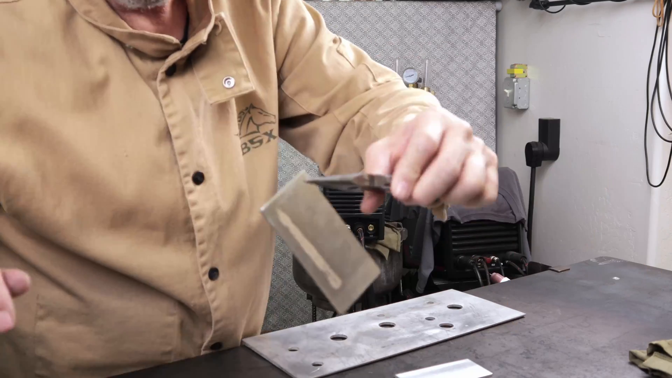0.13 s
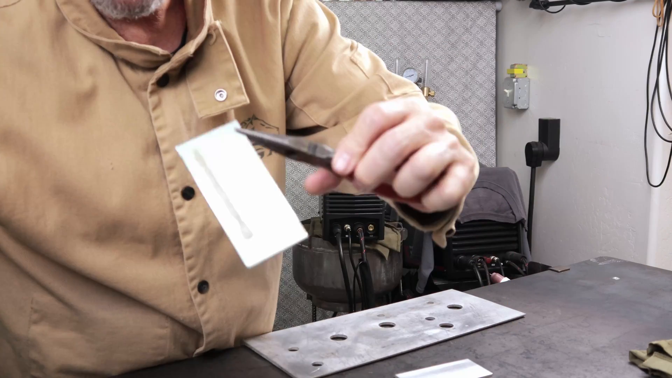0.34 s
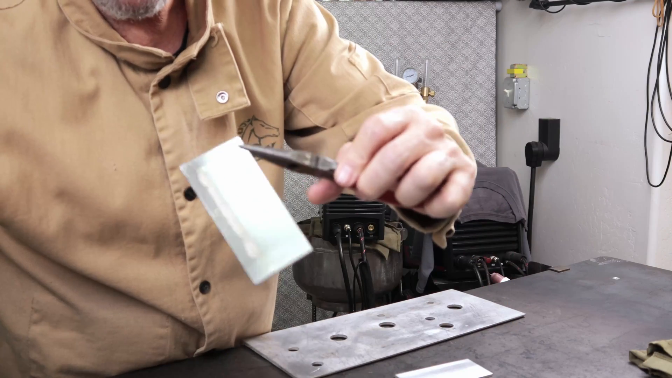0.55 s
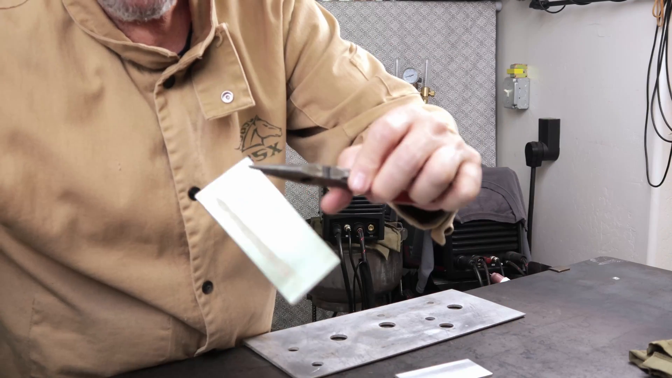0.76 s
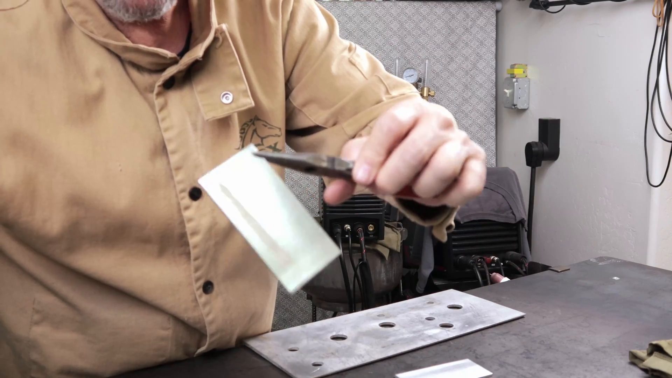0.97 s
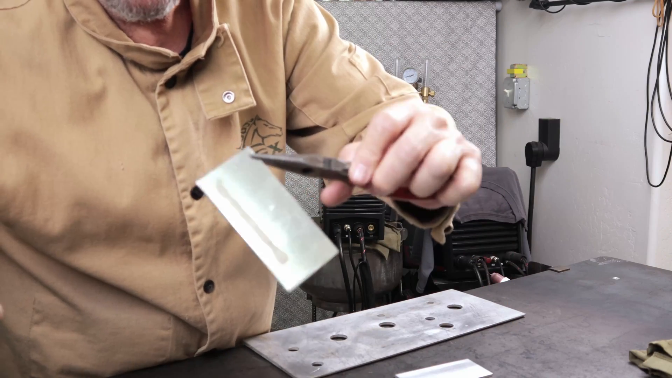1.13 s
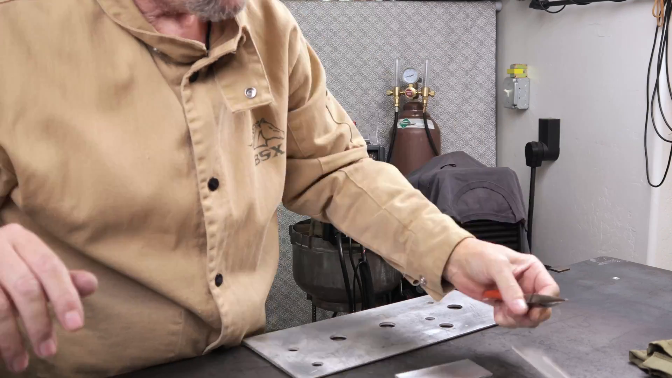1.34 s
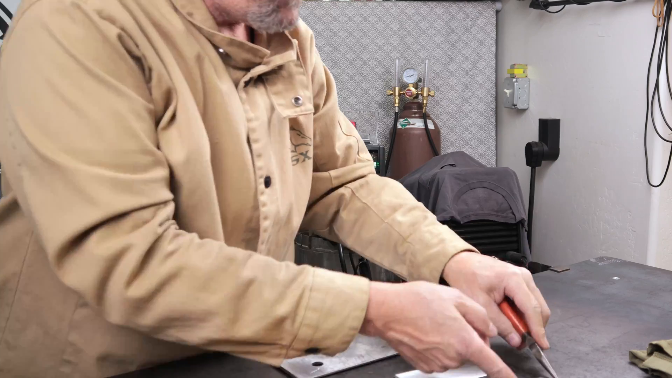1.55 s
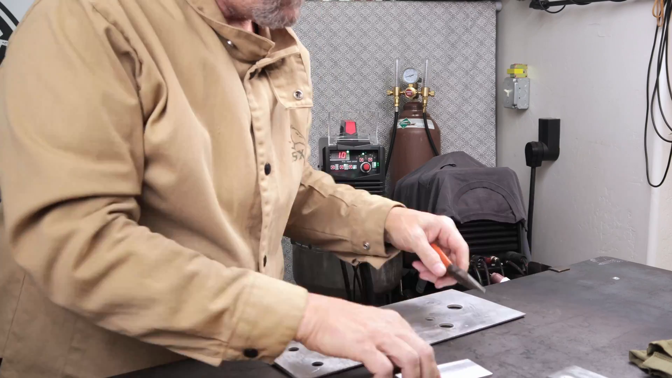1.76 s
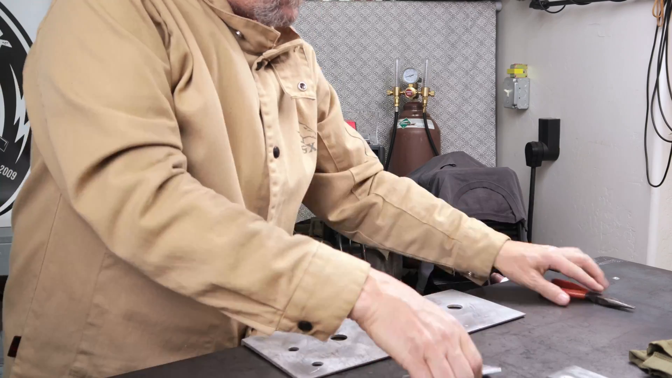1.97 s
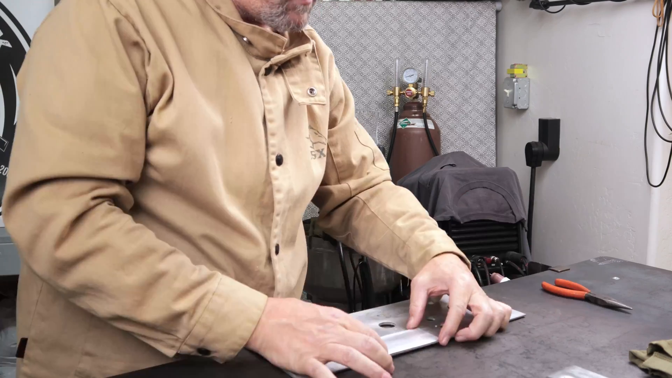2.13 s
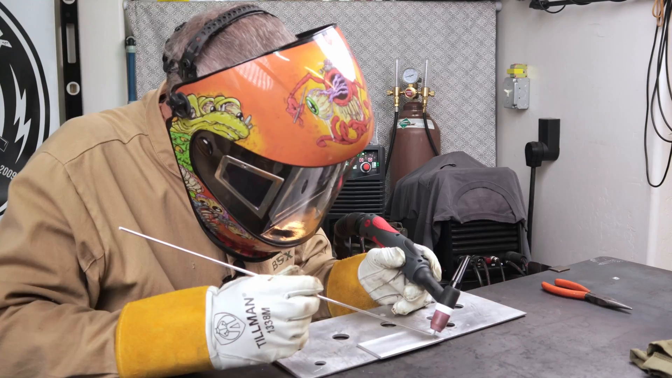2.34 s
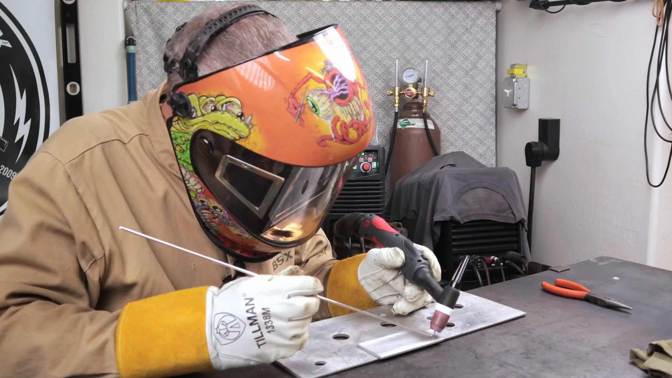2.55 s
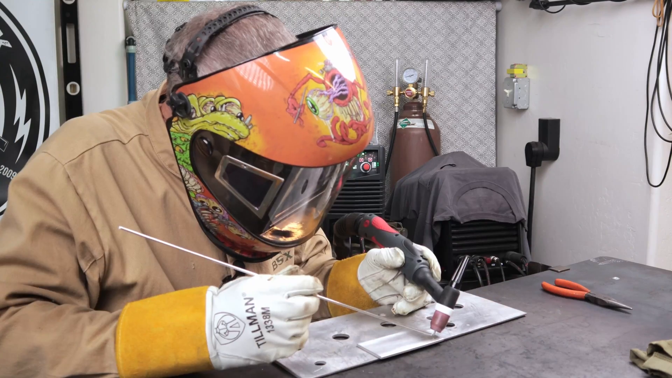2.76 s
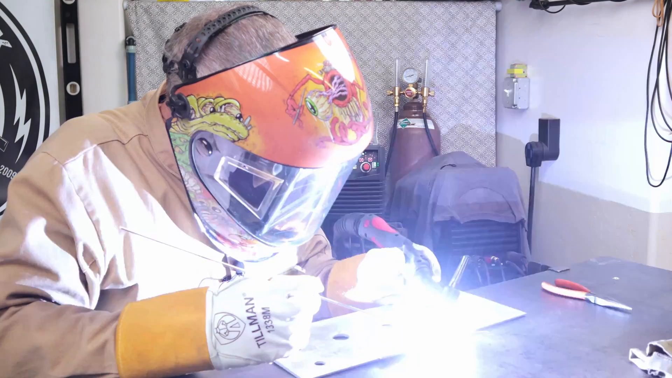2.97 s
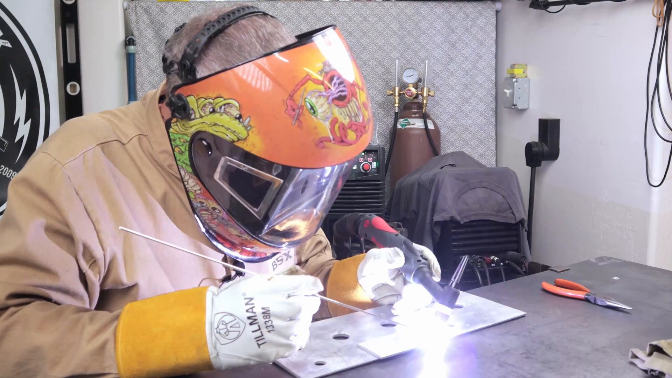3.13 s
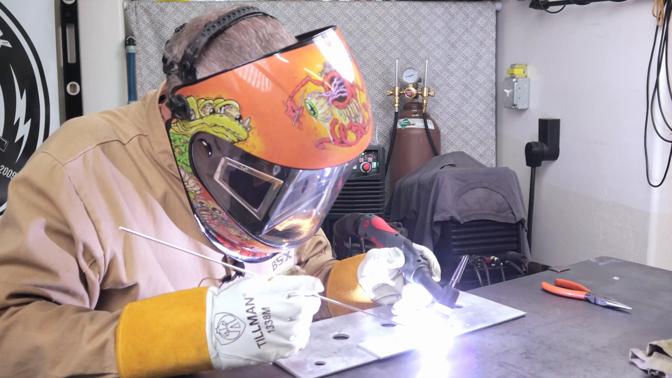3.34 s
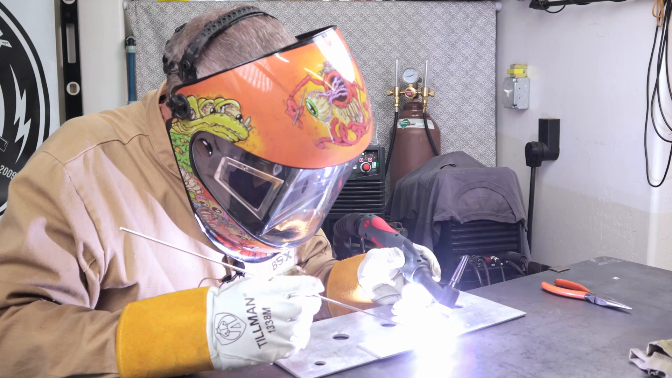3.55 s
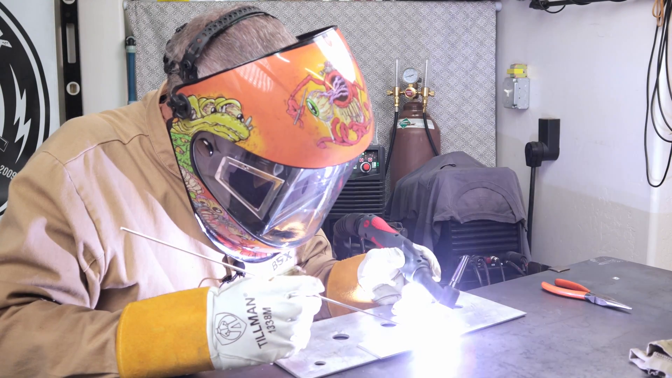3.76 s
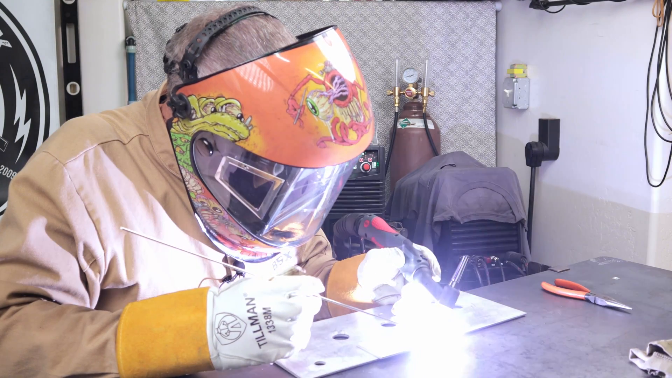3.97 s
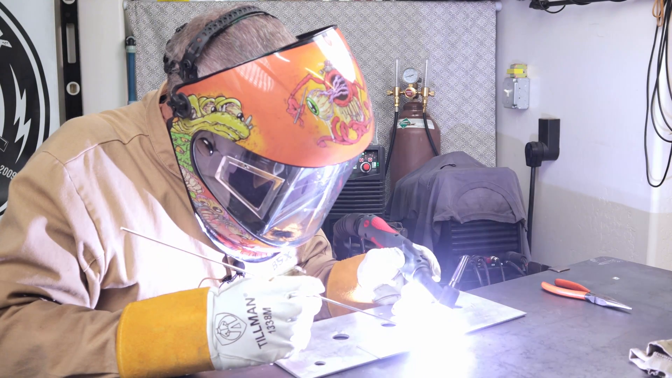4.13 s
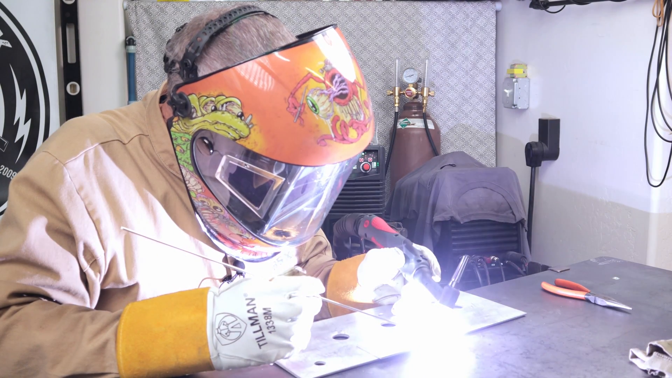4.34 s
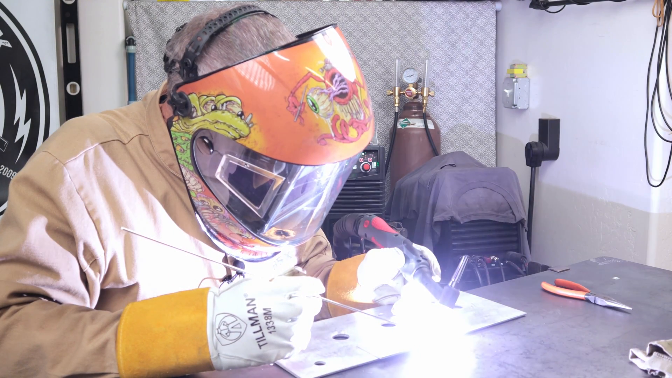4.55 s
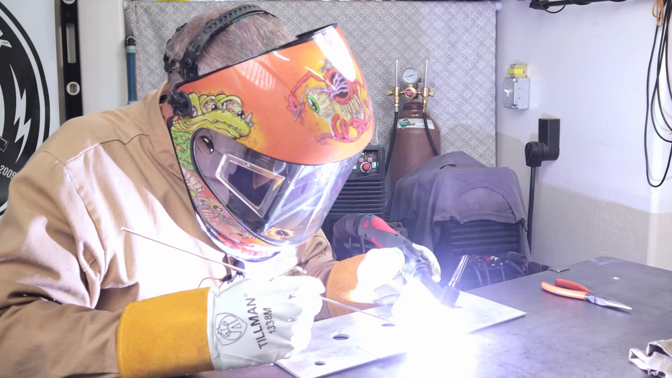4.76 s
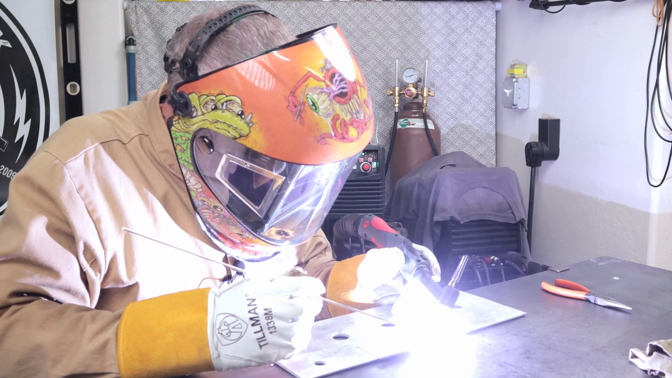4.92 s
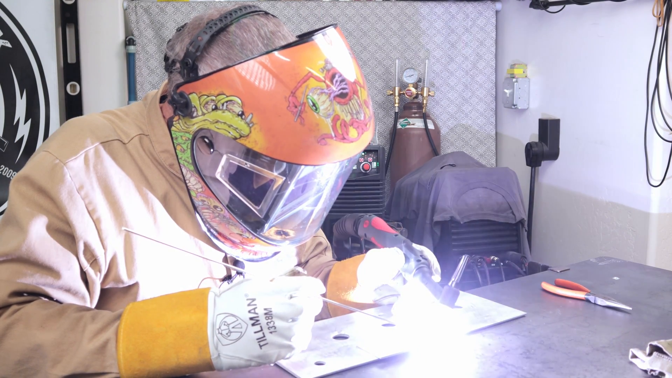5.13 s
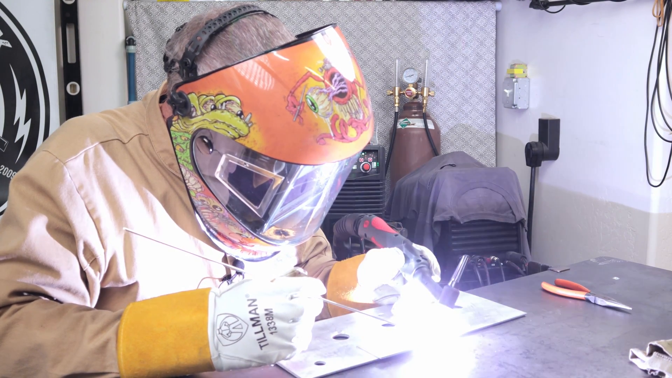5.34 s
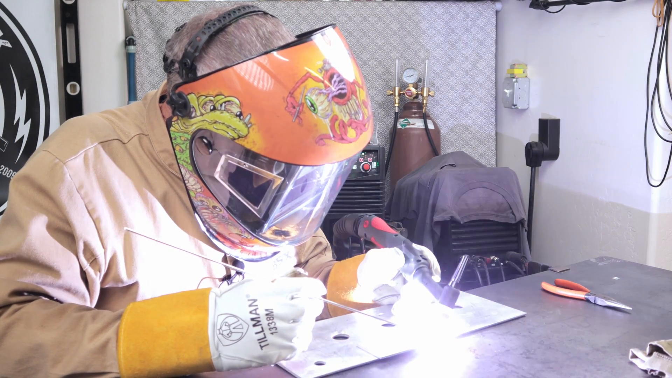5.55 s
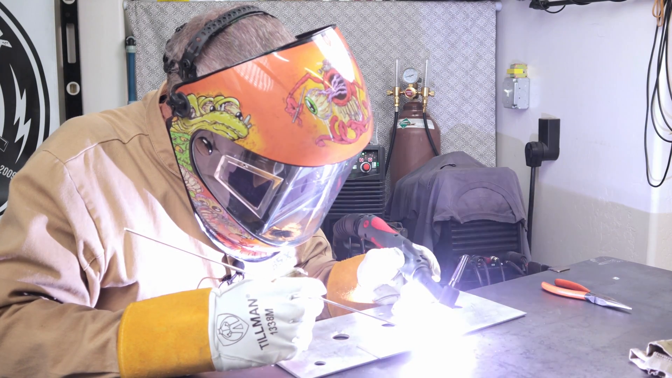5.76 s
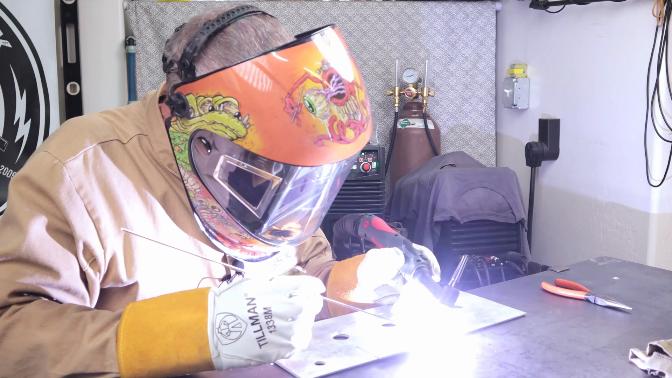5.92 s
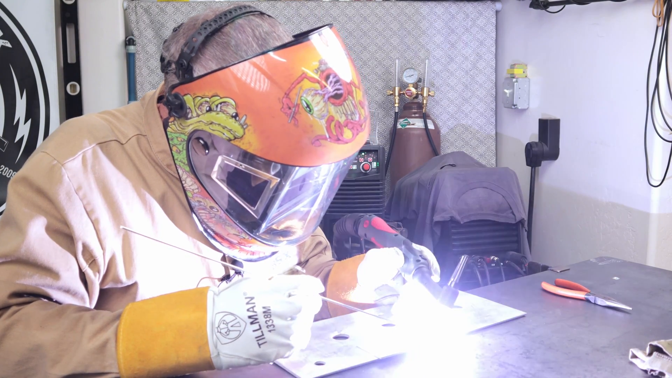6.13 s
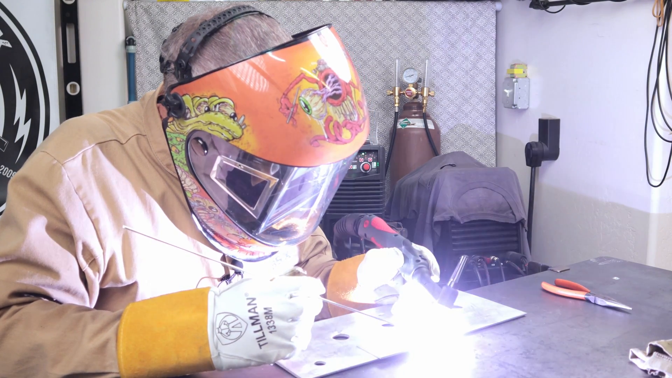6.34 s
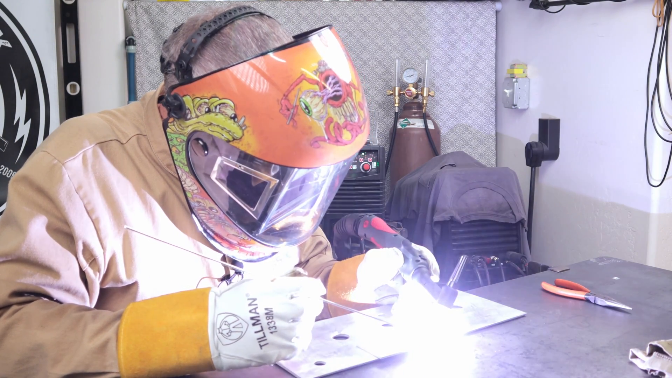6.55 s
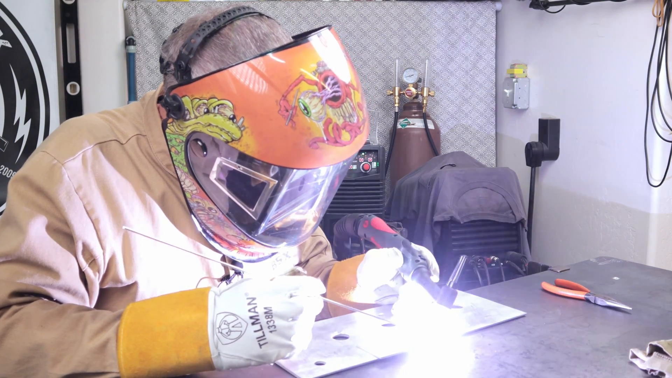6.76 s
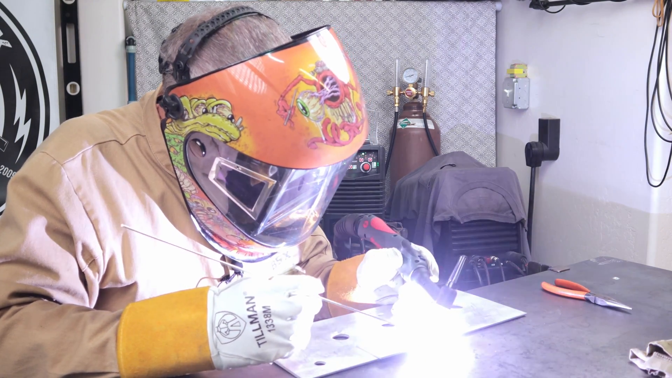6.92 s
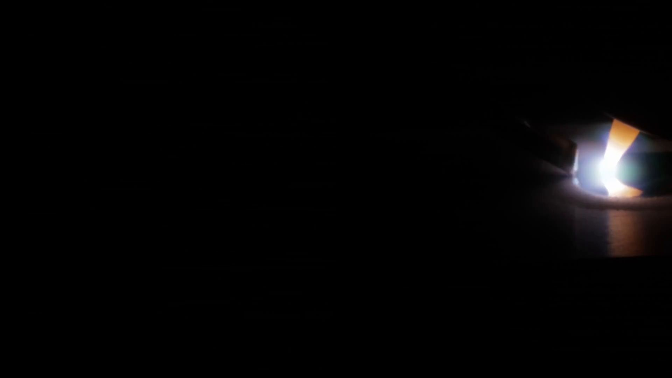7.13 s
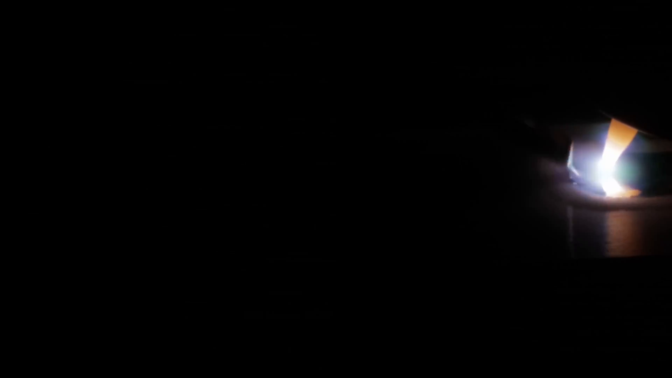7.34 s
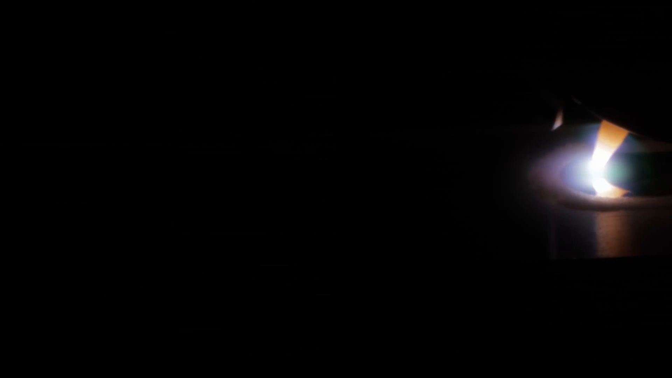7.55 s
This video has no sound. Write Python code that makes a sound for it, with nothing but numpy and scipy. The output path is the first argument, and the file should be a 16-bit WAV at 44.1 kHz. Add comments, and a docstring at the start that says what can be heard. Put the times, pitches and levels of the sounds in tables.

```python
"""Beside a whining cooling fan, a faint tool tick, then a metal test piece clatters onto a steel bench and
more tools tap, with a soft rustle between; the shop fades out and the scene cuts to an AC TIG weld.
The gas valve spits, shielding gas hisses and the nozzle whistles; the high-frequency starter pops and
rattles in the microphone lead, and the arc lights with a flare of hiss. It settles into a hard, even buzz:
two filtered clicks, or snaps, in every current cycle, one at each reversal of polarity."""
import sys
import numpy as np
from scipy import signal
from scipy.fft import rfft, irfft
from scipy.io import wavfile

SR = 44100
rng = np.random.default_rng(int(sys.argv[2]) if len(sys.argv) > 2 else 0)


def persist_wave(psi):
    """Save psi, clipped to +-1, as 16-bit WAV."""
    counts = np.round(np.clip(psi, -1, 1) * 32767).astype(np.int16)
    wavfile.write(sys.argv[1], SR, np.atleast_2d(counts).T)


N = 339129
TIME = np.arange(N) / SR  # s
CUT_S, STRIKE_S = 2.293, 3.0661  # the cut to the weld; the arc's first reversal
ARC_HZ, BALANCE_SHARE = 119.573, .348  # current cycles a second; share of a cycle between its two reversals
FLOW_S, FLOW_RISE_S = 2.889, .01  # start and build-up of the gas flow


def arc():
    """The plasma collapses and relights at each reversal: a thin snap, then a fuller one."""
    # colour of one snap: (frequency [Hz], level [dB])
    snap_colour = [(120, -51), (350, -10.5), (780, -10.5), (1050, -8.5), (1700, -24), (2200, -8),
                   (3900, -0.5), (4500, -2), (6000, -6.5), (7600, -3), (9400, -2.5), (11500, -12.5),
                   (14000, -16), (15800, -25)]
    # narrow peaks and hollows in the colour of the buzz: (frequency [Hz], nominal width [Hz], level [dB])
    buzz_peaks = [(955, 67, 0), (1290, 350, -5.5), (1450, 155, 8.5), (1962, 128, 9.5), (2413, 116, -5),
                  (2530, 300, 1.5), (2950, 300, 2.2), (3514, 100, 2), (4000, 420, -1.5), (4210, 310, 3),
                  (7200, 130, -5), (7230, 140, 3), (10830, 250, -6), (11360, 310, 4), (12400, 300, -11),
                  (12650, 310, 4), (14250, 450, 5)]
    # hollows that vanish as the metal warms: (frequency [Hz], nominal width [Hz], level [dB])
    cold_hollows = [(4170, 1050, -7.5), (7550, 1300, -4.5), (10140, 750, -7), (12400, 550, -10),
                    (13300, 1100, -9)]
    # hollows that open towards the end of the seam: (frequency [Hz], nominal width [Hz], level [dB])
    end_hollows = [(5380, 340, -5.5), (9400, 1100, -4.5), (11400, 650, -9)]
    # level of the buzz's body, under 900 Hz: (time [s], level [dB])
    body_level = [(3.07, -40), (3.2, -33), (3.8, -35), (4.9, -47), (6.1, -39), (6.7, -41.5), (7.0, -34),
                  (7.2, -40.5)]
    # magnetic hum of the welding current, once settled: (multiple of the cycle rate, level [dB rms])
    hum_tones = [(1, -60.5), (2, -59)]

    thin = band(reversals(0, clock_pull=0.6, jitter_s=2e-6, uneven_db=0.78), 400, "high")
    full = band(reversals(BALANCE_SHARE, clock_pull=0.23, jitter_s=2e-6, uneven_db=0.58), 7200, "low")
    snaps = colour(thin + amp(3.0) * full, snap_colour)
    snaps = disperse(shape(snaps, buzz_peaks), hz=9100, width_hz=2040)
    coldness = 1 - warming(0, 1) ** 2
    snaps += coldness * (shape(snaps, cold_hollows) - snaps)

    # the snaps lose low end as the torch travels along the seam
    travel = np.clip((TIME - STRIKE_S) / (TIME[-1] - STRIKE_S), 0, 1)
    snaps += (amp(-4.5 * travel) - 1) * band(snaps, 2200, "low")
    snaps += travel ** 3 * (shape(snaps, end_hollows) - snaps)

    # three bands, each levelled to unit strength while the arc burns
    lit = TIME > STRIKE_S
    spectrum, hz = rfft(snaps), np.fft.rfftfreq(N, 1 / SR)
    low = 1 / (1 + (hz / 900) ** 8)
    high = 1 - 1 / (1 + (hz / 11800) ** 30)
    bands = [irfft(spectrum * part, N) for part in (low, 1 - low - high, high)]
    body, core, sizzle = (part / part[lit].std() for part in bands)

    # core and sizzle grow together; the body swells and thins on its own
    buzz = amp(warming(-20, -17.5)) * (core + amp(-15.5) * sizzle)
    buzz += amp(curve(body_level)) * body

    hum = sum(amp(db) * np.sqrt(2) * np.sin(2 * np.pi * k * ARC_HZ * TIME) for k, db in hum_tones)
    extra_db = 10.5 * (1 - ramp(STRIKE_S, 3.6))  # the hum starts louder and settles
    return buzz + hum * lit * amp(extra_db)


def reversals(delay_share, clock_pull, jitter_s, uneven_db):
    """One snap a cycle and its reflections; the inverter's clock nudges each, which roughens the buzz."""
    inverter_hz = 20005.7  # switching clock
    # reflections off plate, torch, gloves and helmet as the torch travels:
    # (first delay [ms], last delay [ms], gain [ratio to the direct snap])
    echo_paths = [(.088, .095, .25), (.539, .522, .22), (.797, .77, .22), (1.294, 1.292, .27),
                  (1.683, 1.678, .1), (2.521, 2.523, .13), (2.796, 2.827, .12), (3.542, 3.54, -.1),
                  (4.891, 4.921, .15), (8.163, 8.139, -.19)]
    times = np.arange(STRIKE_S + delay_share / ARC_HZ, TIME[-1], 1 / ARC_HZ)
    late, size = rng.standard_normal((len(times), 2)).T
    clock_tick = np.round(times * inverter_hz) / inverter_hz
    times = times + clock_pull * (clock_tick - times) + jitter_s * late
    sizes = amp(uneven_db * size)
    travel = np.linspace(0, 1, len(times))
    out = place(times, sizes)
    for first, last, gain in echo_paths:
        delay_ms = first + (last - first) * travel
        out = out + place(times + delay_ms / 1000, gain * sizes)
    return out


def disperse(x, hz, width_hz):
    """Delays the pitches around hz by a fraction of a millisecond, so each snap becomes a tiny chirp."""
    return x - 2 * signal.lfilter(*signal.iirpeak(hz, hz / width_hz, SR), x)


def shape(x, peaks):
    """Each row lifts or hollows a narrow band; the filter is 0.8 of the nominal width."""
    for hz, width_hz, db in peaks:
        x = x + (amp(db) - 1) * signal.lfilter(*signal.iirpeak(hz, hz / (0.8 * width_hz), SR), x)
    return x


def warming(cold, hot):
    """Moves from the cold value to the hot one as the puddle forms."""
    return cold + (hot - cold) * ramp(STRIKE_S, 1.93)


def starter(jitter_s=.00005, fizz=0.028, count=12):
    """The spark starter leaks into the microphone lead: pop, burst and ticks, bent back by the input coupling."""
    burst_s, burst_hz, swell_s = 3.0214, 376, 0.0056
    # first lone pop: (time [s], height [full scale], hold [ms], decay [ms])
    lone_pop = (3.0086, 1.2, .35, 1.9)
    # thin ticks as the arc catches: (time [s], height [full scale])
    ticks = [(3.0524, 1), (3.0576, 0.66), (3.061, .64), (3.066, 0.73), (3.069, 0.56)]
    out = np.zeros(N)
    add(out, lone_pop[0], spark(*lone_pop[1:]))
    # the burst's pulses swell, fall away and narrow
    for k, hold_ms in enumerate(np.linspace(.75, 0.33, count)):
        age = k / burst_hz
        swell = min((age + 1 / burst_hz) / swell_s, 1)
        height = 1.35 * swell * amp(-104 * age)  # falls 104 dB a second
        add(out, burst_s + age + jitter_s * rng.standard_normal(), spark(height, hold_ms, decay_ms=0.61))
    for s, height in ticks:
        add(out, s, spark(height, hold_ms=0.028, decay_ms=.05))
    return band(out * (1 + fizz * rng.standard_normal(N)), 76, "high")


def spark(height, hold_ms, decay_ms):
    """One flat-topped, one-sided pulse, pointing down, with an exponential fall."""
    ms = TIME[:SR // 20] * 1000
    return -height * np.exp(-np.maximum(ms - hold_ms, 0) / decay_ms)


def hiss(pulsing=0.21, top_hz=10500):
    """Gas spits, then streams from the torch cup; once lit, it hisses more while the current scours the metal."""
    valve_s, spit_db, spit_decay_s = 2.874, -37, .012
    gas_db, flare_db, flare_s = -31, 11, .04  # the hiss flares as the arc strikes
    # colour of the hiss ahead of its low-pass: (frequency [Hz], level [dB per Hz])
    hiss_colour = [(300, -17), (1200, -14.5), (2600, -3), (3200, -7), (3800, -3), (4700, -11.5),
                   (6200, -2.5), (7700, -2.5), (9300, -3), (10200, -7), (11000, -1), (12000, -2.5),
                   (14000, -10), (16000, -16)]
    spit = amp(spit_db) * (TIME > valve_s) * np.exp(-since(valve_s) / spit_decay_s)
    gas = spit + amp(gas_db) * ramp(FLOW_S, FLOW_RISE_S)
    scouring = (TIME - STRIKE_S) * ARC_HZ % 1 < BALANCE_SHARE
    lit_db = warming(-34.5, -29) + flare_db * np.exp(-since(STRIKE_S) / flare_s)
    burning = amp(lit_db) * (1 + pulsing * (2 * scouring - 1))
    level = np.where(TIME < STRIKE_S, gas, burning)
    return level * band(noise(hiss_colour), top_hz, "low", order=2)


def whistle():
    """Eddies at the nozzle ring in one narrow band, which jumps up in pitch and dies once the arc is lit."""
    low_hz, high_hz, jump_s, glide_s, width_hz = 2640, 3700, 2.905, .012, 280
    pitch_hz = low_hz + (high_hz - low_hz) * ramp(jump_s, glide_s)
    phase = 2 * np.pi * np.cumsum(pitch_hz) / SR
    level = ramp(FLOW_S, FLOW_RISE_S) * amp(-34 - 250 * since(STRIKE_S))  # falls 250 dB a second
    return level * (wander(width_hz) * np.cos(phase) + wander(width_hz) * np.sin(phase))


def overload(x, ceiling):
    """The close microphone rounds off the tallest peaks."""
    return x / (1 + (x / ceiling) ** 4) ** (1 / 4)


def weld():
    """Fan, gas and arc share the microphone; the starter pushes them down for an instant under its own pops."""
    # air rush of the fan: (frequency [Hz], relative level [dB per Hz])
    rush_after = [(24, -65), (40, -27), (143, -16), (253, -12), (325, -3), (606, -9), (670, -6),
                  (1050, -16), (1350, -19.5), (1600, -22), (2010, -20.5), (2640, -24), (8520, -35),
                  (15500, -53)]
    # blade tones ahead of the arc: (multiple of the blade rate, level [dB rms])
    tones_after = [(1, -37.5), (2, -50.5), (3, -47.5)]
    # span in which the starter jams the microphone: (start [s], end [s])
    jammed = (3.009, 3.066)
    buzz = arc()
    # the fan is much fainter once the arc burns
    mix = fan(rush_after, -32, tones_after, waver_db=-0.5) * amp(-16.5 * (TIME > STRIKE_S))
    mix += buzz + amp(-24) * workshop(buzz, t60=0.06) + hiss() + whistle()
    mix = band(overload(mix, ceiling=0.69), 41, "high", order=2)
    is_jammed = (TIME > jammed[0]) & (TIME < jammed[1])
    return mix * np.where(is_jammed, amp(-20), 1) + starter()


def bench():
    """A faint tool tick, then a test piece clatters down and more tools tap; the fan ducks and all fades out."""
    # blows of the test piece, then touches of the tools, with a soft hand or sleeve rustle at 1.646 s:
    # (time [s], strength [dB], bench knock [dB re strength], metal ring [dB re strength])
    piece_hits = [(1.4168, -5.5, 1, -14), (1.425, -10, -7, 10), (1.443, -14, -3, 0), (1.456, -11, -6, 7.5),
                  (1.4645, -5, -15, -4)]
    light_touches = [(1.398, -38, -20, -4), (1.646, -35, 5, -16), (1.7185, -18.5, -8, -16),
                     (1.747, -18, -3, -22), (1.910, -31.5, -15, -15), (2.047, -16, -5, -19),
                     (2.052, -14, 9, -22), (2.071, -20.5, 12, -16), (2.145, -16, 1, -1),
                     (2.152, -14.5, -3, 5), (2.163, -11, -10, -13)]
    # ringing of the test piece and of the steel tools: (nominal frequency [Hz], level [dB], t60 [s])
    piece_modes = [(2020, -17, 0.072), (2880, -14, .07), (4480, -9.5, 0.11), (5502, -18, .07),
                   (6100, -6, 0.042), (6820, -5, 0.077), (7450, -6, 0.081), (7967, 1, 0.06),
                   (7870, -6, 0.08), (9000, -7, 0.073), (10800, -5, 0.052), (11950, -9, 0.056),
                   (15050, -21, .06)]
    tool_modes = [(3300, -6, .07), (3542, -14, .08), (6465, -6, 0.1), (7623, -8, .06), (8818, -2, .06),
                  (9141, -5, .06), (11560, -2, 0.056)]
    # air rush of the fan: (frequency [Hz], relative level [dB per Hz])
    rush_before = [(24, -80.5), (40, -34), (207, -23), (333, -12.5), (484, -16.5), (591, -15.5),
                   (653, -17.5), (740, -18.5), (973, -21), (1820, -29), (1960, -30), (4460, -31.5),
                   (9650, -42), (15500, -58.5)]
    # blade tones ahead of ducking and fade: (multiple of the blade rate, level [dB rms])
    tones_before = [(1, -27.5), (2, -54), (3, -57)]
    clatter = blows(piece_hits, piece_modes, loss_db=4, rise_s=0.00056, crack_s=0.0043, count=6)
    clatter += blows(light_touches, tool_modes, loss_db=7, rise_s=0.00079, crack_s=0.0064, count=2)
    shop = fan(rush_before, -36, tones_before, waver_db=-0.34)
    shop = shop + clatter + amp(-21.5) * workshop(clatter, t60=0.12)
    fade_s = 0.77
    return gain_control(shop) * (1 - ramp(CUT_S - fade_s, fade_s))


def blows(hits, modes, loss_db, rise_s, crack_s, count, scatter=.2):
    """Each contact and its weaker rebounds give a gritty crack, a knock from the bench and a ring from the metal."""
    rebound_s = .0058  # mean time between rebounds
    # colour of the crack: (frequency [Hz], level [dB per Hz])
    crack_colour = [(150, -29), (450, 1.5), (900, -9), (1800, -4.5), (3600, -1), (5200, -6), (8000, -7),
                    (12000, -18), (16000, -25)]
    # ringing of the bench: (nominal frequency [Hz], level [dB], t60 [s])
    bench_modes = [(473, -4, 0.12), (522, -4.5, 0.095), (1420, 0, 0.031), (1660, 2, 0.03), (1870, -1, 0.03),
                   (2170, -5, 0.037), (3110, -2.5, 0.04), (3560, -0.5, .04)]
    out, t, grit = np.zeros(N), TIME[:SR // 4], noise(crack_colour)
    for s, db, knock_db, ring_db in hits:
        for k in range(count):
            crack = grit[round(s * SR):][:len(t)] * np.exp(-t / crack_s)
            knock = amp(knock_db - k * loss_db) * ring(bench_modes)  # fades faster than the crack
            blow = crack + knock + amp(ring_db) * ring(modes)
            add(out, s, amp(db - k * loss_db) * blow * (1 - np.exp(-t / rise_s)))
            s += rebound_s * (1 + scatter * rng.uniform(-1, 1))
    return out


def ring(modes, detune=.009):
    """Dying modes; each contact loads the metal differently, so the pitches shift a little and beat."""
    t = TIME[:SR // 4]
    out = np.zeros(len(t))
    for hz, db, t60 in modes:
        shifted_hz = hz * (1 + detune * rng.standard_normal())
        out += amp(db - 60 * t / t60) * np.sin(2 * np.pi * (shifted_hz * t + rng.random()))
    return out / np.linalg.norm(amp([db for _, db, _ in modes])) * np.sqrt(2)


def gain_control(x, follow_hz=22):
    """Turns everything down at a loud blow and recovers slowly."""
    threshold_db, share, recover_db_per_s = -23, 0.45, 42  # share: part of the excess that it removes
    excess_db = 10 * np.log10(band(x ** 2, follow_hz, "low") + 1e-12) - threshold_db
    recovery = recover_db_per_s * TIME
    # the running maximum lets each reduction recover at a steady rate
    return x * amp(recovery - np.maximum.accumulate(share * np.maximum(excess_db, 0) + recovery))


def fan(rush, rush_db, tones, waver_db):
    """Air rushes through the welder's case; the blades add a slightly unsteady whine."""
    blade_hz = 658.6
    turns = np.cumsum(blade_hz * (1 + 0.00079 * wander(3.3))) / SR
    whine = np.zeros(N)
    for k, db in tones:
        whine += amp(db + waver_db * wander(12)) * np.sqrt(2) * np.sin(2 * np.pi * k * turns)
    return whine + amp(rush_db + .5 * wander(4.6)) * noise(rush)


def workshop(x, t60):
    """Diffuse tail of the small, cluttered room: decaying noise that starts after 6 ms."""
    t = TIME[:SR // 2]
    tail = rng.standard_normal(len(t)) * amp(-60 * t / t60) * (t > .006)
    tail = band(tail, 8900, "low")
    return signal.oaconvolve(x, tail / np.linalg.norm(tail))[:N]


def amp(db):
    """Decibels to gain."""
    return 10 ** (np.asarray(db) / 20)


def unit(x):
    """Scales to rms 1."""
    return x / np.sqrt(np.mean(x ** 2) + 1e-20)


def curve(rows):
    """A time table at every sample."""
    return np.interp(TIME, *np.transpose(rows))


def since(s):
    """Seconds since time s at every sample, zero before it."""
    return np.maximum(TIME - s, 0)


def ramp(s, length_s):
    """Rises evenly from 0 at time s to 1."""
    return np.minimum(since(s) / length_s, 1)


def add(mix, s, sound):
    """Mixes a sound in at time s."""
    part = mix[round(s * SR):][:len(sound)]
    part += sound[:len(part)]


def place(times, sizes, count=12):
    """Clicks at exact times, each a windowed sinc."""
    at = np.round(times * SR).astype(int)[:, None] + np.arange(-count, count + 1)
    off = at - times[:, None] * SR
    click = np.sinc(off) * np.cos(np.pi * off / (2 * count + 2)) ** 2
    return np.bincount(at.ravel(), (sizes[:, None] * click).ravel(), N)[:N]


def band(x, hz, kind, order=1):
    """Causal low- or high-pass."""
    return signal.sosfilt(signal.butter(order, hz, kind, fs=SR, output="sos"), x)


def colour(x, points, size=4096):
    """Causal minimum-phase filter with the given spectrum."""
    hz, db = np.transpose(points)
    grid_hz = abs(np.fft.fftfreq(size, 1 / SR)) + 1
    log_gain = np.log(amp(np.interp(np.log(grid_hz), np.log(hz), db)))
    taps = np.fft.ifft(np.exp(np.conj(signal.hilbert(log_gain)))).real
    return signal.oaconvolve(x, taps[:size // 2])[:len(x)]


def noise(points):
    """Noise of rms 1 with the given spectrum."""
    return unit(colour(rng.standard_normal(N), points))


def wander(hz):
    """Random drift of rms 1, mostly slower than hz."""
    return unit(irfft(rfft(rng.standard_normal(N)) / (1 + (np.fft.rfftfreq(N, 1 / SR) / hz) ** 2), N))


def scene():
    """Bench noises, then a cut to the weld."""
    return np.where(TIME < CUT_S, bench(), weld())[None]


def record(dry):
    """Full-scale clipping, then the band limit at 15850 Hz."""
    low_pass = signal.firwin(611, 15850, window=("kaiser", 9), fs=SR)
    return signal.oaconvolve(np.clip(dry, -1, 1), low_pass[None], "same")


dry = scene()
out = record(dry)
persist_wave(out)
```